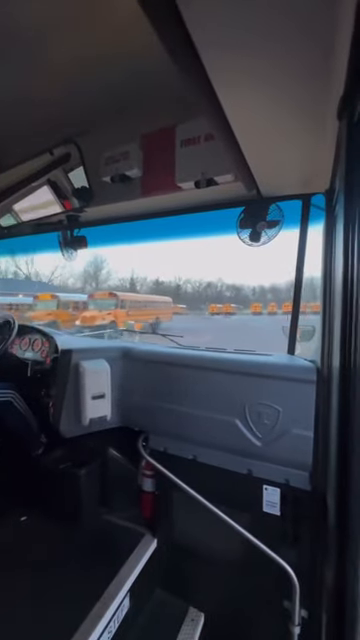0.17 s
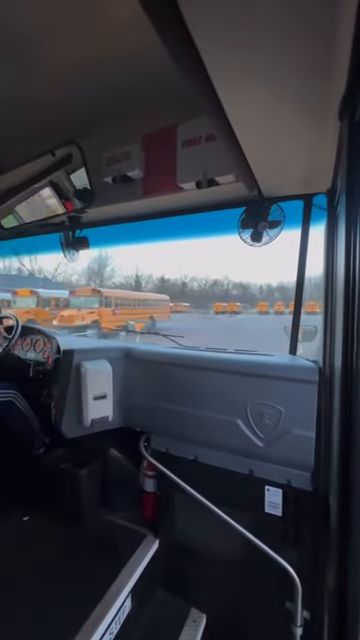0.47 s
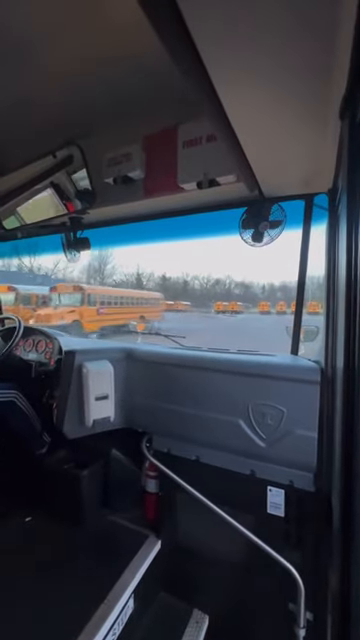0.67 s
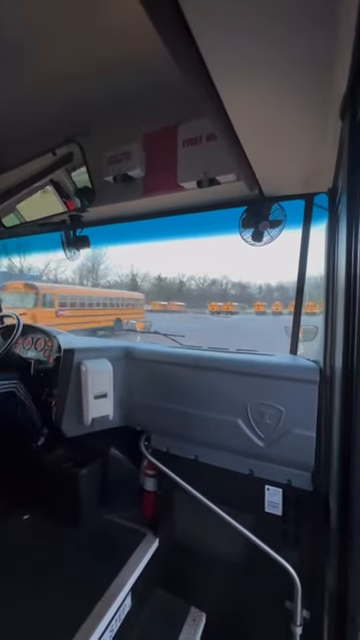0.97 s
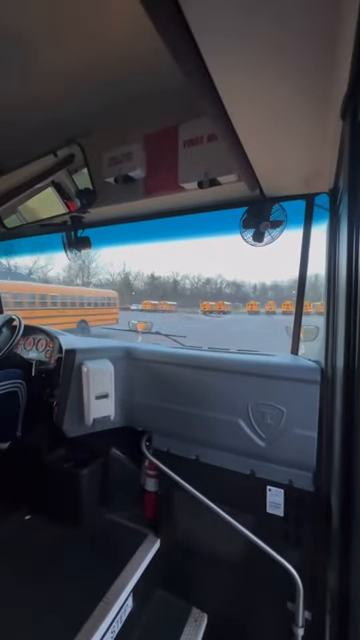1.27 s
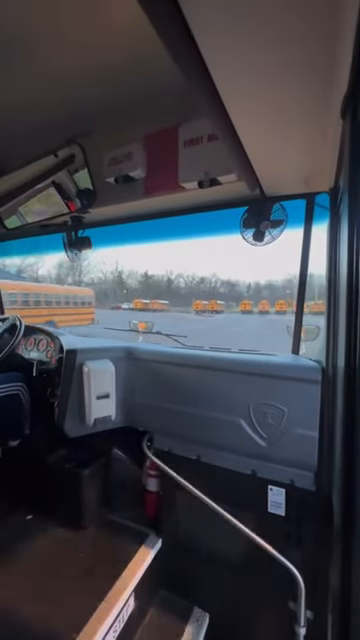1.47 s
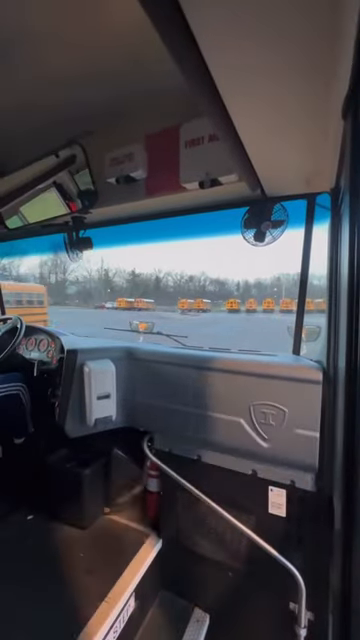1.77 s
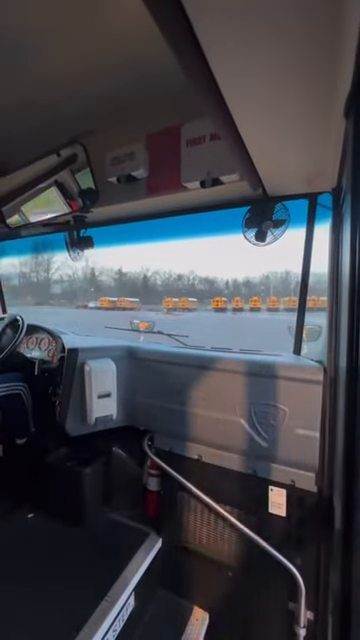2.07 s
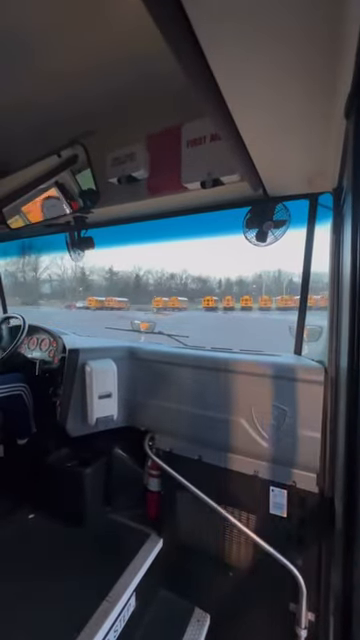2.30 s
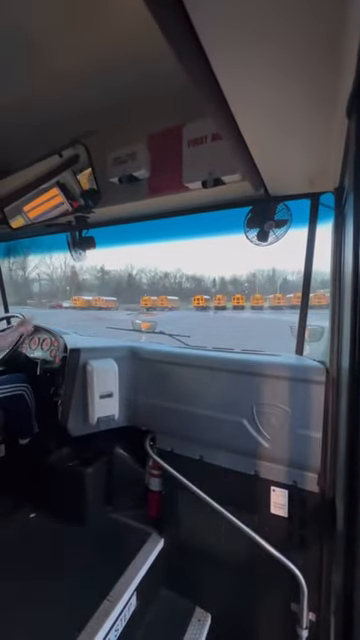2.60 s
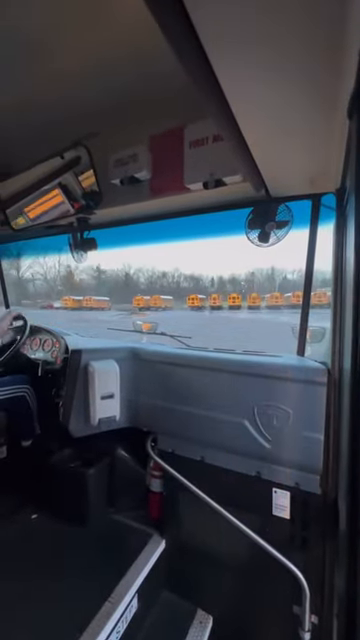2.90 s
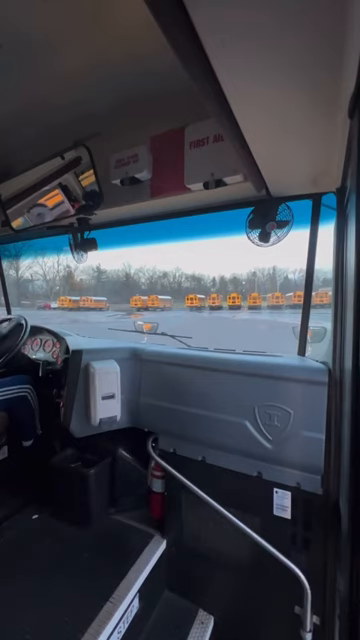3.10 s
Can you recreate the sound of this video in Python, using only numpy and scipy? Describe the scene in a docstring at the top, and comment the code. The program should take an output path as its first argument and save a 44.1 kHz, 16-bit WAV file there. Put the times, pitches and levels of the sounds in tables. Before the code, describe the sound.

Diesel engine drone heard from within a bus cabin: rattling pull first, then a whistling vent, sharp clack and short air burst, quieter coasting with low bumps, a late rattle and faint growl; stereo microphone inside.

```python
"""A six-cylinder diesel pulls amid trim rattles, heard inside a bus creeping across a yard.
The driver lifts off and the cabin booms; vented boost air hisses like a whistle, a valve clacks, air blows off.
Then the bus coasts, bumps and whines, with faint brake squeals, and takes up the drive again with a growl.
Engine tones are sines on multiples of crank speed; clatter, road and air are shaped noise;
the valve is struck modes, trim rattles are bursts of touches, bumps are short low swings."""
import sys
import numpy as np
from scipy import signal
from scipy.fft import rfft, irfft
from scipy.io import wavfile

SR = 44100
rng = np.random.default_rng(int(sys.argv[2]) if len(sys.argv) > 2 else 0)


def dump_mix(stems):
    """Bounce the given channels to the path in sys.argv[1] as a 16-bit WAV at rate SR."""
    frames = np.atleast_2d(stems).T  # one column per channel
    limited = np.clip(frames, -1, 1)  # hard clip at full scale
    pcm = np.round(limited * 32767).astype(np.int16)
    wavfile.write(sys.argv[1], SR, pcm)


def invert_db(x):
    """Field ratio 10**(x/20) for x, a level in decibels (scalar or array-like)."""
    u = np.asarray(x, float) / 20
    return 10 ** u


N = 143325

# crankshaft speed: time_s, turns_per_s
CRANK_SPEED = [(0, 19.15), (.7, 19.38), (.95, 19.67), (1.07, 19.6), (1.2, 18.85), (1.45, 18.35),
               (1.6, 18.25), (2.03, 18.3), (2.2, 19.2), (2.45, 19.8), (2.75, 20.3), (2.95, 19.9),
               (3.25, 19.7)]
# engine tones that follow the load: multiple_of_crank_speed, relative_level_db
ENGINE_ORDERS = [(2, -21.5), (3, -10), (5, -4.5), (7, -11.5), (8, -25), (9, -8.5), (10, -14), (11, -12),
                 (13, -24), (14, -16.5), (15, -10), (16, -17.5)]
# upper engine tones, more sensitive to load: multiple_of_crank_speed, relative_level_db
UPPER_ORDERS = [(18, -44), (20, -43), (22, -38), (24, -39), (27, -45), (30, -41), (36, -43), (39, -35),
                (41, -44), (42, -43), (45, -41), (57, -49), (71, -52), (101, -52)]
# engine load and the orders with their own level:
# time_s, load_re_full_pull_db, boom_4th_order_db, order_6_db, order_12_db, gear_whine_48th_order_db
LOAD = [(0, 2, -30, -28, -20.5, -56), (.15, 2, -18, -25.5, -21.5, -50), (.5, 0, -38, -23, -22, -64),
        (.9, -0.5, -26, -16, -22.5, -38.5), (1.06, -4, -37, -22.5, -33, -60),
        (1.13, -10.5, -18.5, -28, -34, -48), (1.33, -6.5, -16, -42, -32, -41),
        (1.41, -9, -33, -34, -34, -47), (1.52, -26, -25, -39, -30, -47), (1.8, -15, -17, -33, -35.5, -47),
        (2.08, -30, -20.5, -29, -34, -52), (2.13, -14.5, -33, -42, -36.5, -47),
        (2.22, -10, -21.5, -33.5, -49.5, -45.5), (2.4, -13, -44, -32.5, -40, -52),
        (2.7, -13, -30, -29.5, -43, -45.5), (2.93, -13.5, -31, -26, -37, -46.5),
        (3.25, -6, -35, -32, -36, -54)]
# engine effort and road: time_s, relative_clatter_db, rumble_db
EFFORT = [(0, -31, -18), (.2, -33, -22), (.4, -35, -25), (.8, -35.5, -25), (.97, -37, -22),
          (1.17, -43, -26), (1.5, -49, -25), (2, -50.5, -27), (2.5, -50, -25), (2.8, -49, -25),
          (3.05, -49, -23), (3.25, -48, -24)]
# diesel clatter spectrum: frequency_hz, relative_density_db
CLATTER_SPECTRUM = [(150, -10.5), (250, -4), (340, -15), (440, -15.5), (650, -17), (900, -16.5),
                    (1270, -23.5), (2000, -27.5), (3060, -30), (5000, -33.5), (7770, -31), (11000, -47.5),
                    (12800, -60), (13700, -75), (15500, -68), (17000, -100)]
# engine block resonances in the clatter: frequency_hz, width_hz, level_re_clatter_db
BLOCK_RINGS = [(1380, 40, -24), (1955, 88, -24.5), (2770, 120, -29)]
# body, fan and tyre noise spectrum: frequency_hz, relative_density_db
COASTING_SPECTRUM = [(150, -32), (250, -12), (302, -2.5), (353, -6.5), (458, -5.5), (560, -6.5), (646, -12),
                     (945, -8), (1180, -19), (3280, -29), (5410, -32.5), (7900, -31), (10600, -42.5),
                     (11800, -73), (13700, -49), (15500, -44)]
# road rumble spectrum: frequency_hz, relative_density_db
RUMBLE_SPECTRUM = [(12, -47), (20, -0.5), (59, 13), (91, 9), (119, 8.5), (166, 8), (217, -1.5), (302, -7),
                   (317, 6.5), (338, -45), (420, -16), (550, -42.5), (920, -120)]
# body growl as the engine takes up the drive: time_s, level_db
GROWL = [(2.1, -47), (2.5, -49), (2.72, -39.5), (2.9, -41.5), (3.05, -44.5), (3.25, -34)]
# turbocharger whistle: time_s, pitch_hz
TURBO_PITCH = [(0.0, 13000), (0.228, 12900), (0.648, 12530), (0.984, 12407), (1.05, 12300)]
# boost air vent: time_s, level_db, band_centre_hz
VENT = [(0.995, -47, 5000), (1.022, -34, 4850), (1.07, -33, 4350), (1.125, -32, 3900), (1.15, -34, 4200),
        (1.19, -37, 4700), (1.21, -39, 5000)]
# compressed air blow-off: time_s, relative_level_db
BLOW_OFF = [(1.19, -20), (1.211, -24), (1.24, -19), (1.366, -32.5), (1.624, -53), (1.638, -65),
            (1.66, -67.5)]
# blow-off jet spectrum: frequency_hz, relative_density_db
AIR_SPECTRUM = [(650, -47), (1100, -10), (1440, -9.5), (2350, -8), (3350, -6), (4190, -6.5), (7570, 0),
                (10500, -9), (11500, -18), (13100, -23), (15000, -15), (16000, -50)]
# whistles in the jet: frequency_hz, width_hz, level_re_jet_db
AIR_WHISTLES = [(6490, 200, -17), (7090, 200, -17), (7700, 250, -13)]
# valve body modes: frequency_hz, relative_level_db, t60_s
VALVE_MODES = [(515, -6, .04), (720, -2.5, 0.036), (1770, -7, 0.026), (2550, -7, 0.034),
               (3030, -1.5, 0.019), (3260, -8.5, 0.022), (3810, -10, 0.012), (4500, -9, 0.0058),
               (5480, -5, 0.0091), (6130, -4, 0.01), (7300, -8, 0.012), (8300, -10, 0.0069),
               (9800, -4.5, 0.0044), (12900, -4.5, .008)]
# trim rattles: start_s, relative_level_db, decay_s, low_edge_hz, high_edge_hz
RATTLES = [(.005, -33, .03, 6000, 8500), (.09, -29, .015, 6500, 9500), (.085, -27, .02, 1500, 3600),
           (.118, -32, .01, 6000, 8500), (.125, -28, .012, 1500, 3000), (.16, -29, .018, 5500, 8500),
           (.16, -27, .018, 1500, 3600), (.18, -30, .014, 6000, 8500), (.18, -27, .014, 1500, 3000),
           (.24, -33, .015, 6500, 8500), (.325, -33, .02, 5500, 8500), (.335, -30, .012, 1500, 3000),
           (.86, -36, .03, 4000, 10000), (1.695, -46, .015, 5000, 10000), (1.7175, -33, .01, 1000, 8500),
           (1.955, -45, .008, 6000, 10000), (2.2, -40, .03, 2000, 3500), (2.1695, -31, .007, 7000, 10000),
           (2.66, -38, .025, 1400, 3500), (2.72, -38, .02, 2200, 3500), (3.04, -45, .006, 6500, 11000),
           (3.175, -24, .02, 700, 1200), (3.185, -18, .025, 400, 1000), (3.188, -24, .018, 1750, 2250),
           (3.2, -24, .012, 1300, 1800), (3.212, -19, .015, 350, 1000), (3.195, -37, .012, 2500, 5000),
           (3.213, -33, .008, 2500, 5000)]
# wheels over rough ground: start_s, relative_level_db, pitch_hz
BUMPS = [(2.395, -20, 95), (2.473, -15, 109), (2.593, -16.5, 85), (2.786, -11.5, 83.5), (2.87, -11, 111),
         (2.934, -12, 65), (2.953, -12.5, 60), (3.089, -17, 79.5), (3.15, -16, 70), (3.237, -15, 100)]
# driveline whines: start_s, length_s, start_pitch_hz, sag_hz_per_s, level_db
WHINES = [(1.25, .25, 590, 120, -36), (1.6, .42, 542, 75, -39), (2.76, .4, 768, 150, -44)]
# brake squeals: start_s, length_s, pitch_hz, level_db
SQUEALS = [(1.42, 0.083, 7850, -50), (1.56, .08, 8100, -54), (1.66, 0.26, 7800, -64),
           (3.1, 0.23, 8300, -50)]
# stereo noise: frequency_hz, least_left_right_likeness
LIKENESS = [(25, 0.91), (60, 0.95), (250, 0.97), (500, 0.82), (800, 0.74), (1000, 0.9), (1500, 1),
            (2500, 0.71), (4000, 0.084), (8000, 0.17), (15000, 0.13)]
# stereo noise: frequency_hz, left_over_right_db
LEFT_OVER_RIGHT = [(25, -3), (60, 5.5), (180, 0.5), (550, -0.5), (1650, 0.0), (4970, 0.0), (15000, -1.0)]

ORDERS_DB, ORDER_WAVER_DB, ORDER_WAVER_HZ = -20.5, 1.5, 10.8
CLATTER_GAIN_DB, KNOCK_DEPTH, KNOCK_JITTER_CYCLES = 10.5, 0.078, 0.46
COASTING_DB, COASTING_DB_PER_EFFORT_DB = -36.5, 0.31
GROWL_HZ, GROWL_WIDTH_HZ, GROWL_LUMPY_DB = 502, 320, 2
TURBO_DB, TURBO_END_S, TURBO_FADE_S, TURBO_WIDTH_HZ = -54.5, 1.07, 0.048, 130
VENT_RAGGED_DB, VENT_WOBBLE_HZ, VENT_WIDTH_HZ = 2.5, 170, 790
VENT_UPPER_DB, VENT_UPPER_HZ, VENT_UPPER_WIDTH_HZ = -38.5, 8300, 2100
VENT_UPPER_START_S, VENT_UPPER_END_S = 1.01, 1.135
BLOW_OPENS_S, BLOW_RISE_S, BLOW_GAIN_DB = 1.2065, .003, 0.84
VALVE_S, VALVE_DB, VALVE_TOP_HZ = 1.1288, -12.5, 11500
VALVE_BOUNCE_AFTER_S, VALVE_BOUNCE_RE_CLACK_DB = 0.00164, -6
VALVE_LAG_CYCLES, VALVE_LEAD_SAMPLES = 2.2, 20
TOUCHES_PER_S = 1500
WHINE_WAVER_DB = 3
SQUEAL_WIDTH_HZ, SQUEAL_WOBBLE_HZ = 200, 80
CABIN_T60_S, CABIN_TAIL_DB = 0.12, -12
LEFT_LAG_S, LAG_TOP_HZ = 2 / SR, 7000


def rms_one(x):
    """Scale to rms 1."""
    return x / np.sqrt(np.mean(x ** 2) + 1e-20)


def in_time(rows, off_db=None):
    """Table columns at every sample; off_db, if given, applies outside the table."""
    s, *columns = np.transpose(rows)
    return [np.interp(np.arange(N) / SR, s, c, off_db, off_db) for c in columns]


def at_hz(points, hz):
    """Read a spectrum on a log frequency axis."""
    point_hz, value = np.array(points).T
    return np.interp(np.log(hz), np.log(point_hz), value)


def drift(corner_hz):
    """Slow random drift, rms 1: noise through two equal poles, run at SR / 40."""
    r = np.exp(-80 * np.pi * corner_hz / SR)
    slow = signal.lfilter([1], [1, -2 * r, r * r], rng.standard_normal(N // 40 + 2002))[2000:]
    return np.interp(np.arange(N) / 40, np.arange(len(slow)), rms_one(slow - slow.mean()))


def coloured(spectrum, alike=0):
    """Stereo noise of a given spectrum, left-right likeness at least alike; rms 1."""
    hz = np.maximum(np.fft.rfftfreq(N, 1 / SR), 1)
    likeness = np.clip(at_hz(LIKENESS, hz), alike, 1)
    mid, side = rfft(rng.standard_normal((2, N))) * invert_db(at_hz(spectrum, hz))
    mid, side = np.sqrt(1 + likeness) * mid, np.sqrt(1 - likeness) * side
    tilt = invert_db(at_hz(LEFT_OVER_RIGHT, hz) / 2)
    return rms_one(irfft([(mid + side) * tilt, (mid - side) / tilt], N))


def resonance(x, hz, width_hz):
    """Fixed two-pole resonance, gain about 1 at its peak."""
    r = np.exp(-np.pi * width_hz / SR)
    return signal.lfilter([(1 - r * r) / 2, 0, (r * r - 1) / 2],
                          [1, -2 * r * np.cos(2 * np.pi * hz / SR), r * r], x)


def double_resonance(x, hz, width_hz):
    """Two equal resonances in series, scaled to rms 1."""
    return rms_one(resonance(resonance(x, hz, width_hz), hz, width_hz))


def moving_band(hz, width_hz):
    """Stereo noise band with a gliding centre: low-passed noise on quadrature carriers; rms 1."""
    slow = rng.standard_normal((2, 2, N))
    slow = signal.sosfilt(signal.butter(1, width_hz / 2, fs=SR, output="sos"), slow)
    slow = slow + 0.14 * slow[:, :1]  # partly shared by both sides
    slow = signal.sosfilt(signal.butter(1, width_hz, fs=SR, output="sos"), slow)
    phase = 2 * np.pi * np.cumsum(hz) / SR
    return rms_one(slow[0] * np.cos(phase) + slow[1] * np.sin(phase))


def cabin(x):
    """Dry sound plus a short decaying noise response, different on each side."""
    t = np.arange(int(CABIN_T60_S * SR)) / SR
    tail = rng.standard_normal((2, len(t))) * invert_db(-60 * t / CABIN_T60_S) * (t > .003)
    tail = invert_db(CABIN_TAIL_DB) * tail / np.sqrt(np.sum(tail ** 2, axis=1, keepdims=True))
    return x + signal.fftconvolve(x[None], tail, axes=1)[:, :N]


def road_rumble():
    """Low shaped noise with an uneven level."""
    road_db = in_time(EFFORT)[1]
    return invert_db(road_db + 2.0 * drift(13.6)) * coloured(RUMBLE_SPECTRUM)


def coasting_noise():
    """Body, fan and tyre noise that rises a little with engine effort."""
    effort_db = in_time(EFFORT)[0]
    lift_db = effort_db - effort_db.min()
    level_db = COASTING_DB + COASTING_DB_PER_EFFORT_DB * lift_db + 1.2 * drift(8)
    return invert_db(level_db) * coloured(COASTING_SPECTRUM)


def bumps():
    """Short low swings of the floor, each strongest about half a cycle in."""
    t, out = np.arange(N) / SR, 0
    for s, db, hz in BUMPS:
        cycle = np.maximum(t - s, 0) * hz
        swell = np.e * 2 * cycle * np.exp(-2 * cycle)
        out = out - invert_db(db) * swell * np.sin(2 * np.pi * cycle)
    return out


def rattles():
    """Loose trim: dying runs of uneven touches over hiss, banded by the size of the part."""
    out = np.zeros(N)
    struck = rng.random(N) < TOUCHES_PER_S / SR
    touches = struck * rng.standard_normal(N) * np.sqrt(SR / TOUCHES_PER_S)
    touches = touches + 1.4 * rng.standard_normal(N)
    for s, db, decay_s, low_hz, high_hz in RATTLES:
        i = np.arange(int(s * SR), min(int((s + 6 * decay_s) * SR), N))
        age = (i - i[0]) / SR / decay_s
        burst = touches[i] * np.minimum(age * 7.9, 1) * np.exp(-age)
        edges_hz = [low_hz, max(high_hz, low_hz + 500)]
        out[i] += invert_db(db) * signal.sosfilt(signal.butter(2, edges_hz, "band", fs=SR, output="sos"), burst)
    return out


def driveline_whines():
    """Gear whines: sines that swell, sink as the wheels slow, and fade."""
    t, out = np.arange(N) / SR, 0
    for s, length_s, hz, sag_hz_per_s, db in WHINES:
        age_s = t - s
        swell = np.abs(np.sin(np.pi * np.clip(age_s / length_s, 0, 1))) ** 0.27
        tone = np.sin(2 * np.pi * (hz * age_s - sag_hz_per_s * age_s ** 2 / 2))
        out = out + invert_db(db + WHINE_WAVER_DB * drift(10)) * swell * tone
    return out


def brake_squeals():
    """Faint narrow noise bands of wavering pitch that swell and fade."""
    t, out = np.arange(N) / SR, 0
    for s, length_s, hz, db in SQUEALS:
        swell = np.abs(np.sin(np.pi * np.clip((t - s) / length_s, 0, 1)))
        out = out + invert_db(db) * swell * moving_band(hz + SQUEAL_WOBBLE_HZ * drift(6.4), SQUEAL_WIDTH_HZ)
    return out


def body_growl():
    """Lumpy noise through a body resonance as the engine takes up the drive."""
    level_db = in_time(GROWL, off_db=-120)[0] + GROWL_LUMPY_DB * drift(11)
    return invert_db(level_db) * double_resonance(rng.standard_normal(N), GROWL_HZ, GROWL_WIDTH_HZ)


def turbo():
    """Thin turbocharger whistle that sags, then fades as the boost is dropped."""
    hz, = in_time(TURBO_PITCH)
    fade = np.clip((TURBO_END_S - np.arange(N) / SR) / TURBO_FADE_S, 0, 1)
    return invert_db(TURBO_DB) * fade * moving_band(hz, TURBO_WIDTH_HZ)


def boost_vent():
    """Venting boost air: a ragged gliding band and a fixed upper band of noise."""
    t = np.arange(N) / SR
    level_db = in_time(VENT, off_db=-120)[0] + VENT_RAGGED_DB * drift(50)
    centre_hz = in_time(VENT)[1] + VENT_WOBBLE_HZ * drift(90.6)
    vent = invert_db(level_db) * moving_band(centre_hz, VENT_WIDTH_HZ)
    gate = np.clip((t - VENT_UPPER_START_S) / .02, 0, 1) * np.clip((VENT_UPPER_END_S - t) / 0.0055, 0, 1)
    upper = moving_band(np.full(N, VENT_UPPER_HZ), VENT_UPPER_WIDTH_HZ)
    return vent + invert_db(VENT_UPPER_DB) * gate * upper


def blow_off():
    """Compressed air jet with faint whistles; the valve snaps open from a slight leak."""
    opened = np.clip((np.arange(N) / SR - BLOW_OPENS_S) / BLOW_RISE_S, .08, 1)
    white = rng.standard_normal((2, N))
    whistles = sum(invert_db(db) * double_resonance(white, hz, w) for hz, w, db in AIR_WHISTLES)
    jet = coloured(AIR_SPECTRUM, alike=0.36) + whistles
    level_db = in_time(BLOW_OFF, off_db=-120)[0] + BLOW_GAIN_DB + 0.93 * drift(30)
    return invert_db(level_db) * opened * jet


def valve():
    """A clack and a bounce strike the valve body's modes; the heavier modes answer later."""
    hit = np.full(N, 1e-18)
    hit[int(VALVE_S * SR)] = -invert_db(VALVE_DB)
    hit[int((VALVE_S + VALVE_BOUNCE_AFTER_S) * SR)] = invert_db(VALVE_DB + VALVE_BOUNCE_RE_CLACK_DB)
    hit = signal.sosfilt(signal.butter(4, VALVE_TOP_HZ, fs=SR, output="sos"), hit)
    out = np.zeros(N)
    for k, (hz, db, t60_s) in enumerate(VALVE_MODES):
        r, w = invert_db(-60 / (t60_s * SR)), 2 * np.pi * hz / SR
        late = np.roll(hit, int(VALVE_LAG_CYCLES * 2 * np.pi / w) - VALVE_LEAD_SAMPLES)
        gain = (-1) ** k * invert_db(db) * np.sin(w)  # alternate sign
        out += signal.lfilter([0, gain], [1, -2 * r * np.cos(w), r * r], late)
    return out


def crank_angle():
    """Crankshaft angle in radians, the running sum of its speed."""
    return 2 * np.pi * np.cumsum(in_time(CRANK_SPEED)[0]) / SR


def engine_clatter(turn):
    """Diesel clatter and block resonances, pulsing three times a turn with jitter."""
    effort_db = in_time(EFFORT)[0]
    knock = 1 + KNOCK_DEPTH * np.cos(3 * turn + 2 * np.pi * KNOCK_JITTER_CYCLES * drift(20))
    white = rng.standard_normal(N)
    rings = sum(invert_db(db + 2.3 * drift(9.2)) * double_resonance(white, hz, w) for hz, w, db in BLOCK_RINGS)
    level_db = effort_db + CLATTER_GAIN_DB + 1.15 * drift(27.0)
    return invert_db(level_db) * knock * (coloured(CLATTER_SPECTRUM) + rings)


def engine_tones(turn):
    """Sines on crank multiples: four have their own level, the rest follow the load and waver."""
    load_db, boom_db, sixth_db, twelfth_db, whine_db = in_time(LOAD)
    levels_db = {}
    for k, db in ENGINE_ORDERS:
        levels_db[round(k)] = db + ORDERS_DB + load_db + ORDER_WAVER_DB * drift(ORDER_WAVER_HZ)
    for k, db in UPPER_ORDERS:
        levels_db[k] = db + 1.41 * load_db + 2 * drift(ORDER_WAVER_HZ)
    whine_db = whine_db + WHINE_WAVER_DB * drift(12.0)
    levels_db.update({4: boom_db, 6: sixth_db, 12: twelfth_db, 48: whine_db})
    out = 0
    for k, db in levels_db.items():
        out = out + np.sqrt(2) * invert_db(db) * np.sin(k * turn + rng.uniform(0, 2 * np.pi))
    return out * invert_db(np.array([[.4], [-.4]]))  # left slightly louder


def scene():
    """All sources; the valve and rattles excite the cabin."""
    turn = crank_angle()
    background = road_rumble() + coasting_noise() + bumps()
    drive = driveline_whines() + brake_squeals() + body_growl()
    air = turbo() + boost_vent() + blow_off()
    engine = engine_clatter(turn) + engine_tones(turn)
    return background + drive + air + cabin(valve() + rattles()) + engine


def roll_off(x):
    """The treble ends steeply here."""
    return signal.sosfilt(signal.butter(12, 16530, fs=SR, output="sos"), x)


def record(dry):
    """Stereo pickup: the left port lags, less and less towards the treble."""
    hz = np.fft.rfftfreq(2 * N, 1 / SR)
    lag_s = LEFT_LAG_S / (1 + (hz / LAG_TOP_HZ) ** 2)
    mirrored = np.r_[dry[0], dry[0][::-1]]  # no jump at the wrap
    left = irfft(rfft(mirrored) * np.exp(-2j * np.pi * hz * lag_s), 2 * N)[:N]
    return roll_off(np.stack([left, dry[1]]))


dry = scene()
out = record(dry)
dump_mix(out)
```